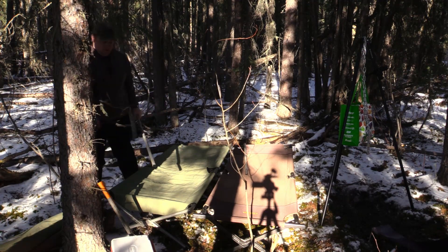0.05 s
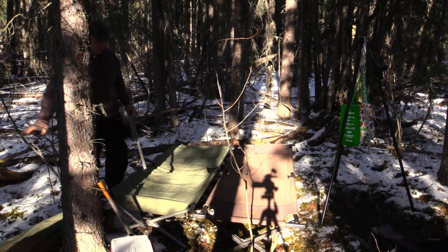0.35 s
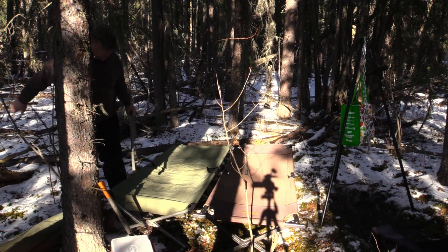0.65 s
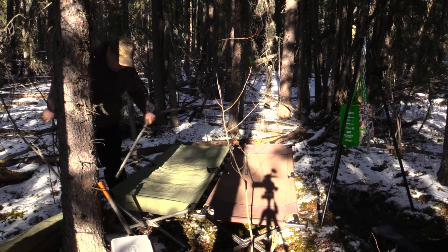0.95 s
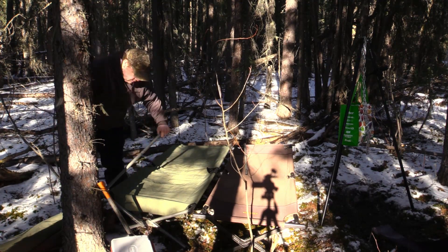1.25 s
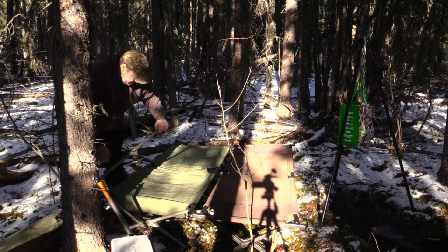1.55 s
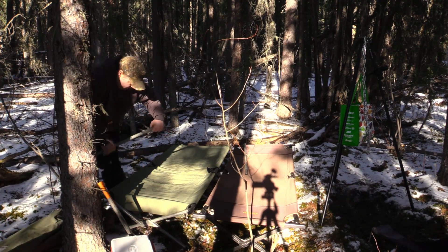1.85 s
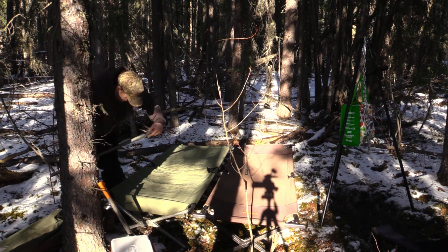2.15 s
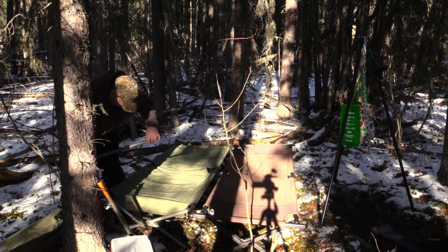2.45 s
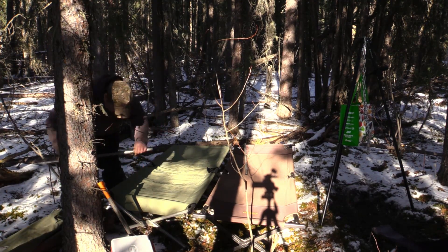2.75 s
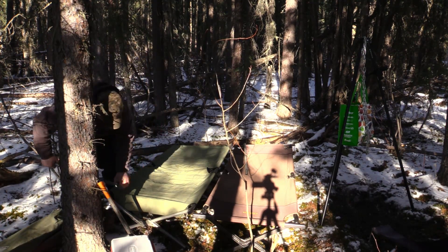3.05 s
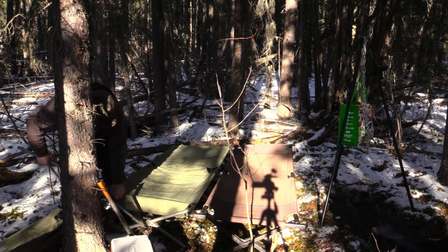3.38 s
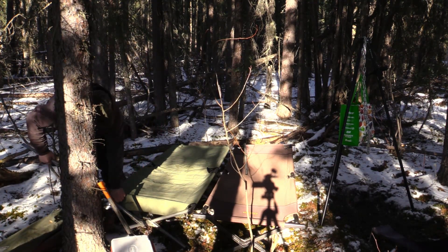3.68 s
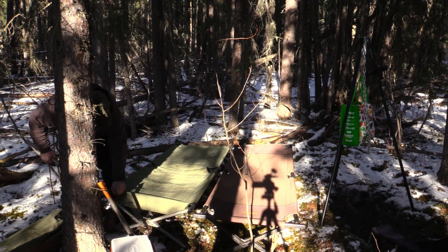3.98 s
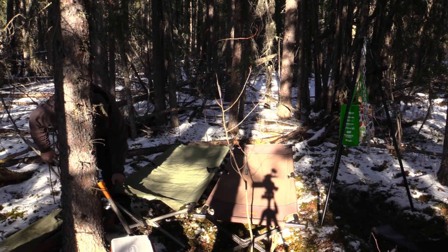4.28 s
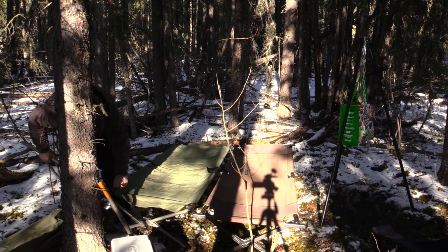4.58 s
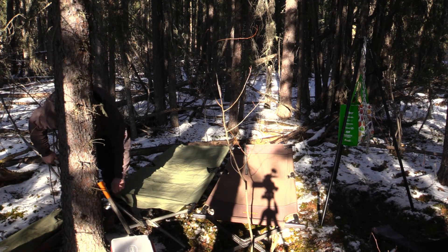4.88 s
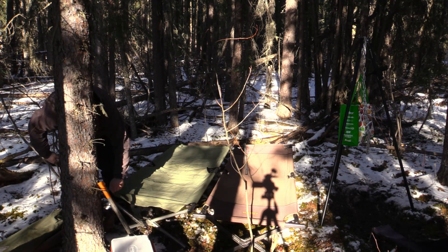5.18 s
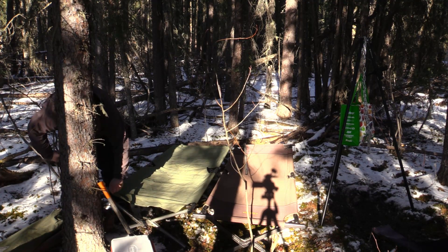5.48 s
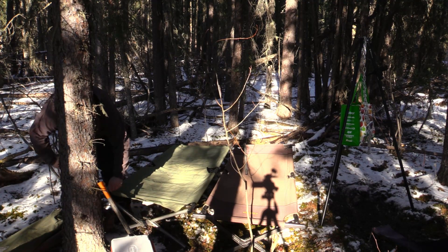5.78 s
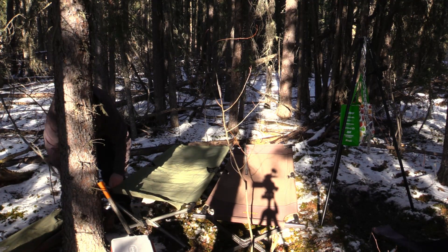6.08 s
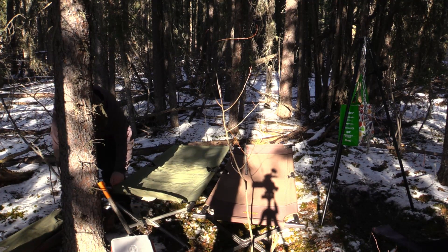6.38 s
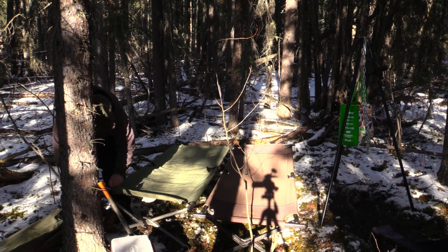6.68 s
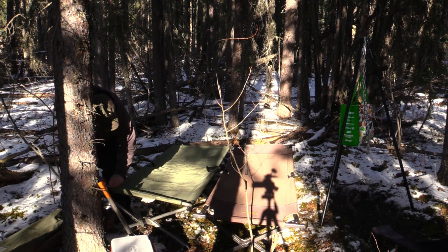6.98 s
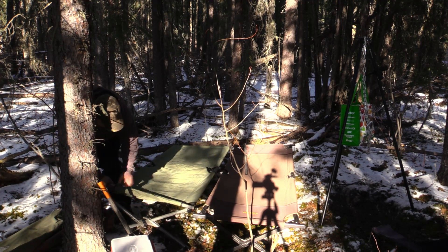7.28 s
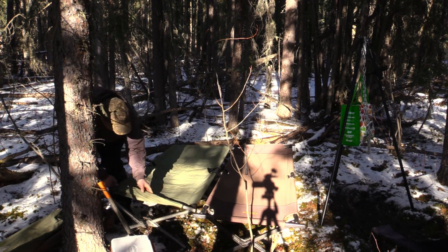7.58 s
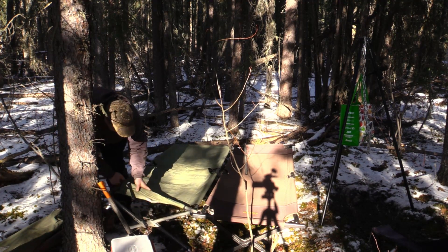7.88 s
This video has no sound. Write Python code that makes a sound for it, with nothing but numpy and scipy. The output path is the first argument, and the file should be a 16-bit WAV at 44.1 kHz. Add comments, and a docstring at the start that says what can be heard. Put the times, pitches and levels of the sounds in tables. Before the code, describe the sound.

After crunching steps and snapping twigs, a pole slides through cot fabric with two zip-like rasps, clinking against the frame in light wind.

```python
"""Light wind rumbles on the microphone in a snowy forest, where the trunks give a faint echo.
Someone steps up to a camp cot: cloth flaps, canvas drags, boots thud, crust and twigs snap, the frame knocks.
A metal pole slips as it is picked up, shifts in its cloth sleeve and clinks against the frame.
Near 6 s it is fed in with two pushes, ticking over the weave so fast that it rasps like a zip.
More clinks follow, and near 8 s the cot is set down and its taut canvas drums."""
import sys
import numpy as np
from scipy import signal
from scipy.fft import rfft, irfft, next_fast_len
from scipy.io import wavfile
from scipy.ndimage import uniform_filter1d, map_coordinates

SR = 44100
rng = np.random.default_rng(int(sys.argv[2]) if len(sys.argv) > 2 else 0)


def dump(signal):
    """Clip the signal to [-1, 1] and save it as 16-bit WAV at the path in sys.argv[1]."""
    limited = np.clip(np.atleast_2d(signal).T, -1, 1)
    pcm = np.round(limited * 32767).astype(np.int16)
    wavfile.write(sys.argv[1], SR, pcm)


N = 354343


def amp(db):
    """Decibels to gain."""
    return 10 ** (np.asarray(db) / 20)


def unit(x):
    """Scale to rms 1."""
    return x / np.sqrt(np.mean(x ** 2) + 1e-20)


def unit_hit(x):
    """Scale a hit to the energy of rms 1 held for 10 ms."""
    return x / np.sqrt(np.sum(x ** 2) / (SR / 100) + 1e-20)


def add(track, s, x):
    """Mix x into the track at time s."""
    part = track[max(round(s * SR), 0):][:len(x)]
    part += x[:len(part)]


def wobble(rate):
    """A smooth random curve, rate knots a second."""
    knots = rng.standard_normal(int(N * rate / SR) + 4)
    return map_coordinates(knots, [np.arange(N) * rate / SR])


def swells(rows, drop_db=8.5, shape=1.57):
    """An envelope per level column; each move is drop_db down one rise before and one fall after its peak."""
    t = np.arange(N) / SR
    power = np.zeros((len(rows[0]) - 3, N))
    for s, rise, fall, *levels in rows:
        near = (t > s - 3 * rise) & (t < s + 3 * fall)
        away = np.maximum((s - t[near]) / rise, (t[near] - s) / fall)
        power[:, near] += amp(np.array(levels)[:, None] - drop_db * away ** shape) ** 2
    return np.sqrt(power)


def filtered(x, response):
    """Filter x by a response given as a function of frequency."""
    size = next_fast_len(len(x) + 4096)
    return irfft(rfft(x, size) * response(np.fft.rfftfreq(size, 1 / SR)), size)[:len(x)]


def coloured(x, eq, size=4096):
    """Minimum-phase EQ through (frequency [Hz], level [dB]) points; the result has rms 1."""
    hz, db = np.transpose(eq)
    log_hz = np.log(np.fft.rfftfreq(size, 1 / SR) + 1)
    log_gain = np.log(amp(np.interp(log_hz, np.log(hz), db)))
    cepstrum = irfft(log_gain)
    cepstrum[1:size // 2] *= 2
    cepstrum[size // 2 + 1:] = 0
    impulse = irfft(np.exp(rfft(cepstrum)))
    return unit(signal.oaconvolve(x, impulse)[:len(x)])


def resonate(x, hz, width):
    """Two band-passes in series; width is relative to their centre."""
    return filtered(x, lambda f: (1j * f * width * hz / (hz * hz - f * f + 1j * f * width * hz)) ** 2)


def patchy(x, depth_db):
    """Each fold and fibre has a colour of its own: gain varies at random over pitch and time."""
    spectrum = signal.stft(x, nperseg=256)[2]
    field = rng.standard_normal(spectrum.shape)
    for axis in (0, 1, 0, 1):
        field = uniform_filter1d(field, size=4, axis=axis)
    return unit(signal.istft(spectrum * amp(depth_db * unit(field)), nperseg=256)[1][:N])


def friction(rate, spread_db, smooth):
    """Tiny slips of unequal size, rate a second, over a share of smooth hiss."""
    sizes = amp(spread_db * np.minimum(rng.exponential(size=N), 4))
    slips = (rng.random(N) < rate / SR) * sizes * np.sign(rng.standard_normal(N))
    return np.sqrt(1 - smooth) * unit(slips) + np.sqrt(smooth) * rng.standard_normal(N)


def crunch(rate, t60, spread_db=5):
    """Bits of crust and stiff cloth give way, rate a second, each in a tiny burst."""
    t = np.arange(SR // 20) / SR
    breaks = (rng.random(N) < rate / SR) * amp(spread_db * rng.uniform(-1, 1, N))
    envelope = signal.oaconvolve(breaks, amp(-60 * t / t60))[:N]
    return unit(envelope * rng.standard_normal(N))


def burst(t60, scatter_db, scatter_t60, edge):
    """A sharp edge, a brief noisy break and a weaker scatter, heard again off the frozen ground."""
    t = np.arange(SR // 12) / SR
    decay = amp(-60 * t / t60) + amp(scatter_db - 60 * t / scatter_t60)
    direct = unit_hit(rng.standard_normal(len(t)) * decay) + edge * unit_hit(t == 0)
    bounce = np.roll(direct, round(rng.uniform(.0005, .002) * SR))
    return direct + 0.6 * bounce


# tone of the forest bed and of the wind rumble: (frequency [Hz], level [dB])
FOREST_EQ = [(40, -12.5), (140, -0.5), (270, -2.5), (450, 0), (650, -7), (950, -14), (1550, -14.5),
             (1900, -21), (2700, -22.5), (3600, -24), (8000, -27.5), (16000, -30)]
RUMBLE_EQ = [(10, -22), (22, -8.5), (56, -3.5), (85, -4), (115, -16), (200, -33), (500, -84)]
# gusts: (peak time [s], rise [s], fall [s], level [dB])
WIND_GUSTS = [(.02, .1, 0.23, -51.5), (.62, 0.16, 0.16, -51), (1.17, 0.16, 0.22, -44), (2.3, .25, 0.2, -53),
              (3.0, 0.34, 0.33, -60), (3.65, 0.29, 0.14, -61), (4.38, 0.56, 0.34, -52.5),
              (7.15, 0.16, 0.08, -51), (7.8, 0.72, 0.27, -52)]


def air(hush_db=-58.5, draught_db=-58.5, buffet_db=2):
    """A far forest hush, with a draught and gusts buffeting the microphone."""
    hush = amp(hush_db + 0.77 * wobble(2.73)) * coloured(rng.standard_normal(N), FOREST_EQ)
    wind = np.hypot(amp(draught_db), swells(WIND_GUSTS)[0])
    buffeting = amp(buffet_db * wobble(7.4))
    return hush + wind * buffeting * coloured(rng.standard_normal(N), RUMBLE_EQ)


# dark tone of heavy folds: (frequency [Hz], level [dB])
FOLD_EQ = [(60, -17), (150, -4.5), (230, -7.5), (350, -2), (520, -2), (700, -8.5), (950, -12), (2000, -53)]
# cloth flapping and bunching: (peak time [s], rise [s], fall [s], level [dB])
CLOTH_FLAPS = [(.03, .1, 0.18, -51.5), (.27, 0.092, 0.053, -45), (.44, 0.056, 0.26, -52.5),
               (.8, 0.017, 0.045, -53), (.98, 0.11, 0.034, -49), (1.14, 0.05, 0.048, -52),
               (1.425, 0.016, 0.05, -35), (1.49, .06, .12, -39), (6.22, 0.28, 0.081, -49.5),
               (6.78, 0.059, .13, -49.5), (7.5, 0.34, .2, -62), (7.925, 0.017, .04, -41.5)]


def flaps():
    """Heavy folds make a dull, grainy flutter."""
    return swells(CLOTH_FLAPS)[0] * coloured(friction(400, spread_db=8.0, smooth=0.75), FOLD_EQ)


# crisp top of fibres and ice: (frequency [Hz], level [dB])
CRISP_EQ = [(1200, -24.5), (2300, -2.5), (2850, 6.5), (3400, -2), (4600, 0.5), (5500, -2.5), (8200, -1),
            (10000, -6), (13000, -10.5), (16000, -17)]


def fibres(breaks):
    """Stiff fibres and ice crystals give way in a bright sizzle."""
    grain = friction(1300, spread_db=3.5, smooth=0.59) + 0.73 * breaks
    return patchy(coloured(grain, CRISP_EQ), depth_db=3.0)


# airy tone of the sleeve: (frequency [Hz], level [dB])
SLEEVE_EQ = [(1200, -6), (2200, 3), (2750, 2.5), (3600, 1.5), (4600, 3), (6000, -1.5), (9000, -5),
             (16000, -13)]


def swish():
    """Dense little slips of the sleeve's weave blend into a smooth hiss."""
    return patchy(coloured(friction(3000, spread_db=1.0, smooth=0.69), SLEEVE_EQ), depth_db=2.5)


# midrange of rubbed canvas and of a hollow body: (frequency [Hz], level [dB])
CANVAS_EQ = [(300, -20), (550, -5), (700, -7), (850, -3), (1120, -1), (1400, -0.5), (1700, -4), (2000, -10),
             (2650, -8), (3300, -9.5), (7000, -82)]
HOLLOW_EQ = [(400, -19.5), (850, -12), (1050, -5.5), (1250, -9), (1420, -0.5), (1560, -0.5), (1720, -9.5),
             (1950, -8.5), (2400, -20), (3200, -14), (7000, -47)]
# canvas dragged over the cot: (peak time [s], rise [s], fall [s], rub [dB], hiss [dB])
CANVAS_DRAGS = [(.1, 0.2, 0.081, -57, -59), (.32, 0.12, 0.042, -45, -51), (.445, 0.078, 0.065, -47.5, -57),
                (.63, 0.075, 0.091, -59, -52.5), (.91, 0.12, .06, -53, -55), (1.08, 0.22, 0.21, -63, -60.5),
                (1.3, 0.21, 0.11, -56, -62), (1.49, .08, 0.051, -40, -47), (1.62, 0.1, 0.12, -51, -55),
                (6.25, 0.24, 0.061, -43, -52), (6.83, 0.1, .14, -43.5, -52.5), (7.06, 0.092, .06, -56, -63),
                (7.4, 0.18, .04, -52, -61), (7.58, 0.12, 0.088, -51.5, -62), (7.89, 0.14, 0.1, -52, -51.5)]


def drags(idle_db=-72):
    """Canvas rubs over the frame, which rings a little; fibres hiss, and clothes rustle between moves."""
    rub, hiss = swells(CANVAS_DRAGS)
    breaks = crunch(rate=150, t60=0.0088)
    grain = friction(900, spread_db=5.5, smooth=0.68) + 0.52 * breaks
    cloth = coloured(patchy(grain, depth_db=3.0), CANVAS_EQ)
    frame = coloured(friction(1300, spread_db=-2.0, smooth=0.73), HOLLOW_EQ)
    sizzle = amp(-1) * fibres(0.39 * breaks) + amp(-2) * swish()
    return (rub + amp(idle_db)) * (cloth + amp(-9.5) * frame) + hiss * sizzle


# boots and cot landing on the ground: (time [s], level [dB], pitch [Hz], decay t60 [s])
GROUND_THUDS = [(.106, -42.5, 375, .03), (.172, -36, 258, 0.019), (.600, -29, 122, 0.05),
                (1.001, -39.5, 275, 0.053), (1.027, -36.5, 270, 0.12), (1.134, -36, 188, .04),
                (1.428, -33.5, 430, 0.071), (1.483, -35, 219, 0.068), (1.498, -35, 250, 0.031),
                (1.728, -41, 377, .03), (2.932, -43, 363, 0.033), (3.14, -29.5, 312, 0.051),
                (3.145, -39, 135, 0.033), (3.749, -46, 171, 0.047), (3.752, -38, 540, 0.066),
                (4.199, -43, 450, 0.033), (4.241, -46, 131, 0.084), (7.906, -36, 400, 0.074)]


def thuds():
    """Soft blows: one push and some settling, through a heavily damped low resonance."""
    out, t = np.zeros(N), np.arange(SR // 5) / SR
    for s, db, hz, t60 in GROUND_THUDS:
        settling = unit_hit(rng.standard_normal(len(t)) * amp(-60 * t / t60))
        push = 0.93 * unit_hit(t == 0)
        add(out, s, amp(db) * unit_hit(resonate(push + settling, hz, width=0.81)))
    return out


def snap(hz):
    """A short bright break of unit strength."""
    return unit_hit(resonate(burst(0.006, -10, 0.075, edge=0.3), hz, width=1.35))


# twigs and crust breaking: (time [s], snap [dB], snap pitch [Hz], woody body [dB])
TWIG_CRACKS = [(0.1116, -40, 6100, -43), (0.156, -44, 7100, -53), (.17, -35.5, 5600, -53),
               (0.1966, -40.5, 4220, -46.5), (0.2517, -38.5, 5000, -40.5), (0.3056, -34, 5900, -40),
               (0.3274, -28.5, 6200, -41), (0.4316, -35, 5900, -47), (0.458, -35.5, 5200, -38.5),
               (0.4994, -42, 6200, -60), (0.7753, -47, 5700, -52), (0.823, -37, 7400, -49),
               (0.8278, -42, 7500, -62), (0.9159, -45.5, 4200, -41.5), (1.177, -50, 4700, -54),
               (1.372, -33.5, 4700, -60), (1.4214, -36.5, 4160, -45), (1.6116, -39.5, 7800, -54),
               (1.7291, -39, 6200, -49), (1.899, -59, 6000, -64), (2.2835, -51, 4000, -54),
               (2.4129, -48.5, 6000, -49.5), (2.622, -52, 6200, -52), (2.6474, -45.5, 4900, -47.5),
               (2.7042, -37, 4300, -44), (2.7265, -36.5, 6250, -43), (2.8546, -50, 6200, -61),
               (2.9633, -49, 6600, -65), (3.029, -45, 7500, -51.5), (3.074, -39, 4050, -40.5),
               (3.1134, -41, 8200, -58), (3.166, -47, 6000, -48), (3.2135, -49, 6500, -53),
               (3.261, -50, 7040, -47), (3.303, -47.5, 5910, -55), (7.4865, -47, 4900, -58),
               (8.0165, -45, 5670, -66)]


def cracks(body_hz=1550):
    """Each twig or plate of crust breaks with a bright snap over a woody body."""
    out = np.zeros(N)
    for s, db, hz, body_db in TWIG_CRACKS:
        fracture = burst(0.019, -6, 0.052, edge=0.91)
        body = unit_hit(resonate(fracture, body_hz * np.exp(rng.normal(0, 0.16)), width=1.0))
        add(out, s, amp(db) * snap(hz) + amp(body_db) * body)
    return out


# boots crushing crusted snow and twigs: (peak time [s], rise [s], fall [s], level [dB])
SNOW_STEPS = [(.2, .06, .04, -55), (.265, 0.032, .05, -39), (.33, 0.065, 0.1, -35.5),
              (.44, .07, 0.05, -36.5), (.835, 0.043, 0.086, -51), (.915, 0.051, 0.018, -46.5),
              (1.465, .02, .09, -38.5), (1.72, 0.057, 0.026, -46.5), (2.66, 0.06, 0.083, -52.5),
              (2.87, 0.14, 0.15, -52), (3.085, 0.039, 0.1, -50), (3.28, .05, 0.058, -53.5),
              (3.525, .02, .04, -56), (3.69, 0.039, 0.097, -55), (4.08, 0.25, 0.41, -60),
              (4.2, 0.026, 0.011, -45)]


def footsteps(idle_db=-76.5, light_ticks=1.44, heavy_ticks=0.87, body_db=-10):
    """A light tread ticks in single breaks; under full weight they sink into the crunch."""
    tread = swells(SNOW_STEPS)[0] + amp(idle_db)
    tick_gain = np.interp(tread, amp([-51, -41]), [light_ticks, heavy_ticks])
    breaks = tick_gain * crunch(rate=140, t60=.012)
    body = coloured(friction(900, spread_db=1, smooth=0.24) + 0.74 * breaks, HOLLOW_EQ)
    return tread * (fibres(breaks) + amp(body_db) * body)


# the cot's frame and fittings: (time [s], body [dB], body pitch [Hz], weight [dB], edge [dB])
FRAME_KNOCKS = [(.347, -36, 1180, -38.5, -39), (.527, -52, 900, -43, -60), (0.7112, -44.5, 1420, -42, -61),
                (0.7901, -42.5, 1080, -37.5, -49), (0.8066, -41, 900, -36, -43),
                (1.019, -40, 1660, -60, -56), (1.4218, -37, 1290, -52, -46),
                (1.5246, -36.5, 1730, -42, -45), (1.693, -38.5, 1750, -51, -39.5),
                (3.1383, -39.5, 1080, -39, -44), (3.7493, -33, 1310, -28, -34.5),
                (3.836, -51, 900, -48, -67), (3.9818, -46.5, 1530, -48.5, -69),
                (4.096, -48.5, 1270, -46.5, -57), (4.1758, -41, 1620, -45, -60),
                (4.2064, -38, 1280, -39, -58), (4.2446, -36.5, 1450, -44, -45),
                (5.535, -53.5, 1450, -52, -60), (5.6947, -36, 1320, -43, -55),
                (5.8632, -49, 1300, -46, -59), (5.8917, -38.5, 1390, -40.5, -60),
                (6.2857, -33, 1140, -44, -35.5), (6.316, -46, 1200, -32.5, -65),
                (7.156, -45.5, 1060, -58, -64), (7.3773, -45, 1690, -45, -69),
                (7.5104, -41.5, 1150, -62, -67), (7.5589, -44, 895, -48, -47.5),
                (7.5743, -34, 1140, -39, -48), (7.6235, -38, 950, -49, -47), (7.683, -47.5, 1350, -63, -69),
                (7.8863, -39, 1000, -43, -70), (7.9001, -30, 1460, -33, -42),
                (7.9065, -34.5, 2090, -46, -42), (7.9385, -34.5, 1110, -46, -52)]


def knocks(weight_hz=526, weight_trim_db=-2, edge_hz=2920):
    """A knock on the frame has a hollow body, a low weight behind it and a sharp edge."""
    out = np.zeros(N)
    for s, db, hz, weight_db, edge_db in FRAME_KNOCKS:
        body = unit_hit(resonate(burst(0.012, -8, 0.052, edge=0.89), hz, width=0.74))
        weight = unit_hit(resonate(burst(0.016, -17, 0.067, edge=1.3), weight_hz, width=0.73))
        edge = snap(edge_hz)
        add(out, s, amp(db) * body + amp(weight_db + weight_trim_db) * weight + amp(edge_db) * edge)
    return out


# bright tone of taut weave: (frequency [Hz], level [dB])
WEAVE_EQ = [(700, -13), (1400, 2), (2800, 4), (4500, 2.5), (6500, 2.5), (9000, -6), (12000, -4),
            (16000, -18)]
# long even pulls: (start [s], end [s], level [dB])
CLOTH_PULLS = [(1.173, 1.284, -56.5), (1.408, 1.742, -55), (1.93, 2.22, -67), (5.903, 6.331, -52.5),
               (6.695, 7.155, -54), (7.276, 7.423, -57), (7.7, 7.935, -56.5)]


def pulls(fade_s=0.019):
    """Taut cloth runs through the hands with an even hiss that starts and stops abruptly."""
    t = np.arange(N) / SR
    gate = sum(amp(db) * np.clip(np.minimum(t - start, end - t) / fade_s + .5, 0, 1)
               for start, end, db in CLOTH_PULLS)
    return gate * patchy(coloured(friction(2000, spread_db=4, smooth=0.53), WEAVE_EQ), depth_db=3.5)


# strokes of the pole over the weave: (time [s], speed [threads/s], level [dB])
PICKUP_SLIP = [(1.25, 1520, -66), (1.268, 1560, -55), (1.295, 1060, -60), (1.32, 840, -59),
               (1.365, 990, -66)]
FIRST_FEED = [(5.88, 1500, -57), (5.965, 1380, -39), (6.04, 1350, -51), (6.11, 1170, -47),
              (6.165, 1400, -39), (6.205, 1575, -36.5), (6.245, 1470, -36), (6.286, 1250, -33.5),
              (6.335, 620, -50)]
SECOND_FEED = [(6.685, 1190, -60), (6.75, 1202, -50), (6.78, 1198, -53), (6.825, 1100, -43),
               (6.855, 790, -45), (6.894, 719, -39), (6.925, 690, -43), (6.97, 620, -57)]


def rough_tone(phase, rate):
    """A tone whose strength and phase change at random, rate times a second."""
    return wobble(rate) * np.sin(phase) + wobble(rate) * np.cos(phase)


def rasp(strokes, firm_db=-39.5, skip_hz=1060, loose_db=-10, skip_db=-9, drone_hz=684, drone_db=-9):
    """The pole ticks over the threads, so pitch follows its speed; the uneven weave blurs the note."""
    t = np.arange(N) / SR
    times, speeds, levels = np.vstack(strokes).T
    hz, db = np.interp(t, times, speeds), np.interp(t, times, levels)
    sliding = sum((t > stroke[0][0]) & (t < stroke[-1][0]) for stroke in strokes)
    phase = 2 * np.pi * np.cumsum(hz * (1 + .014 * wobble(350))) / SR
    note = unit(amp(2.5 * wobble(170)) * np.sin(phase))
    # a firm stroke sings, a light one only scrapes
    firm = np.interp(db, [firm_db - 20, firm_db], [.1, .92])
    zip_tone = np.sqrt(firm) * note + np.sqrt(1 - firm) * rough_tone(phase, 320)
    # looser patches of the sleeve drag along at other speeds
    loose = amp(loose_db) * rough_tone(phase, 900)
    # above skip_hz the sleeve also catches on every second thread
    sub_octave = amp(skip_db) * np.clip(4 * (hz / skip_hz - 1), 0, 1) * rough_tone(phase / 2, 120)
    sleeve_drone = amp(drone_db) * unit(resonate(rng.standard_normal(N), drone_hz, width=0.26))
    return sliding * amp(db + 0.5) * (zip_tone + loose + sub_octave + sleeve_drone)


# the pole shifting in its sleeve: (peak time [s], rise [s], fall [s], hollow rub [dB], hiss [dB])
POLE_SLIDES = [(1.8, .05, 0.082, -68, -67), (2.12, .25, 0.23, -65, -65), (2.45, 0.063, 0.023, -58.5, -80),
               (3.09, .2, 0.1, -57, -71), (3.39, 0.067, 0.054, -59.5, -56), (3.445, 0.04, 0.015, -52, -69),
               (3.52, 0.016, 0.033, -60, -55), (3.575, .04, 0.053, -54.5, -64),
               (3.69, .06, 0.069, -57.5, -59), (3.96, 0.075, 0.076, -56, -58.5),
               (4.195, 0.032, 0.033, -44, -49), (4.3, 0.058, 0.051, -63, -69),
               (4.45, 0.041, 0.036, -54, -59.5), (4.6, 0.063, .035, -63.5, -64),
               (4.78, 0.032, 0.037, -67, -55.5), (5.425, 0.013, 0.043, -56, -56),
               (5.62, .14, .15, -61, -69), (5.84, 0.17, .05, -58, -66), (5.965, 0.094, 0.14, -41, -53),
               (6.13, 0.11, 0.066, -45.5, -50), (6.5, 0.13, 0.11, -69, -64)]


def slides():
    """The sleeve hisses along the pole and the rubbing sounds through the hollow tube."""
    rub, hiss = swells(POLE_SLIDES)
    slips = friction(1200, spread_db=5.5, smooth=0.63) + 0.49 * crunch(rate=130, t60=0.013)
    tube = coloured(slips, HOLLOW_EQ)
    cloth = coloured(friction(900, spread_db=2.5, smooth=0.61), CANVAS_EQ)
    return rub * (tube + amp(-10) * cloth) + hiss * swish()


# modes of the pole: (frequency [Hz], level [dB], free decay t60 [s])
POLE_MODES = [(1080, -19.5, 0.14), (1575, -10.5, 0.13), (1690, -3.5, 0.064), (1551, 0.5, 0.085),
              (2120, -4, 0.044), (2590, -14.5, 0.092), (3030, -10, 0.085), (3930, -24, 0.066),
              (4500, -21.5, 0.062), (5600, -15, 0.059), (8100, -17, 0.027)]
# the pole striking the frame: (time [s], ring [dB], share of free decay [0-1], tick [dB])
POLE_CLINKS = [(3.7510, -28.5, 0.12, -56), (6.7199, -30, 0.17, -49.5), (6.8721, -21, 0.29, -34.5),
               (7.0889, -24, 0.36, -42), (7.9009, -27.5, 0.87, -53)]


def clinks(tick_hz=3170):
    """The metal pole ticks and rings briefly, damped by the hand and the sleeve."""
    out, t = np.zeros(N), np.arange(SR // 4) / SR
    for s, db, free, tick_db in POLE_CLINKS:
        for hz, mode_db, t60 in POLE_MODES:
            # the grip detunes and weights the modes a little at every blow
            cycles = hz * (1 + rng.normal(0, 0.012)) * t + rng.random()
            decay = amp(db + mode_db + rng.normal(0, 2.0) - 60 * t / (t60 * free))
            add(out, s, decay * np.sin(2 * np.pi * cycles))
        tick = resonate(burst(0.005, -8, 0.046, edge=2.5), tick_hz, width=0.79)
        add(out, s, amp(tick_db) * unit_hit(tick))
    return out


# modes of the taut canvas: (frequency [Hz], level [dB], decay t60 [s])
CANVAS_MODES = [(353, 0, 0.13), (495, -4, 0.18), (651, -3, 0.091)]


def canvas_drum(at_s=7.905, level_db=-27.5):
    """As the cot is set down, the stretched canvas answers with a few damped modes."""
    out, t = np.zeros(N), np.arange(SR // 4) / SR
    for hz, db, t60 in CANVAS_MODES:
        add(out, at_s, amp(level_db + db - 60 * t / t60) * np.sin(2 * np.pi * hz * t))
    return out


def rustle(catch_db=2, catch_hz=110, grip_db=1.22, grip_hz=28):
    """Snow, folds, canvas and sleeve catch and let go together; taut cloth runs evenly."""
    catches = unit(amp(catch_db * wobble(catch_hz) + grip_db * wobble(grip_hz)))
    return catches * (footsteps() + flaps() + drags() + slides()) + pulls()


def muffled(x, cutoff_hz=12000):
    """Snow and cloth soften the very top."""
    return filtered(x, lambda hz: 1 / np.sqrt(1 + (hz / cutoff_hz) ** 4))


def trunk_echo(x, t60, wet_db, predelay_s=.006):
    """The trees scatter the sound into a faint, diffuse tail."""
    t = np.arange(SR // 2) / SR
    scatter = rng.standard_normal(len(t)) * amp(-60 * t / t60) * (t > predelay_s)
    tail = resonate(scatter, 2500, width=10.0)
    return amp(wet_db) * signal.oaconvolve(x, tail / np.linalg.norm(tail))[:N]


def scene():
    """The work at the cot, its echo and the forest air, in mono."""
    work = rustle() + rasp([PICKUP_SLIP, FIRST_FEED, SECOND_FEED])
    work += muffled(cracks() + knocks()) + clinks() + thuds() + canvas_drum()
    return (work + trunk_echo(work, t60=0.41, wet_db=-20) + air())[None]


def record(dry):
    """A brick-wall low-pass at 16 kHz on the whole mix."""
    return filtered(dry[0], lambda hz: hz < 16000)[None]


dry = scene()
out = record(dry)
dump(out)
```